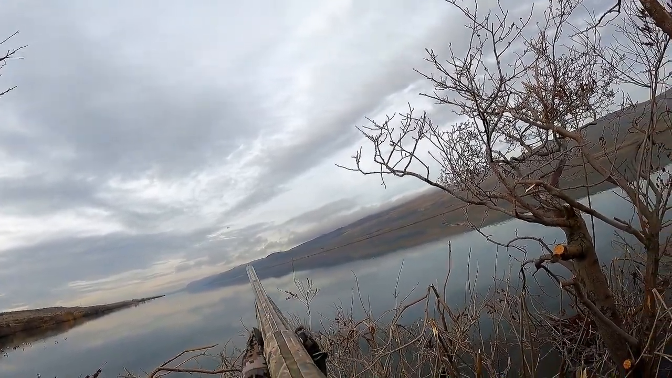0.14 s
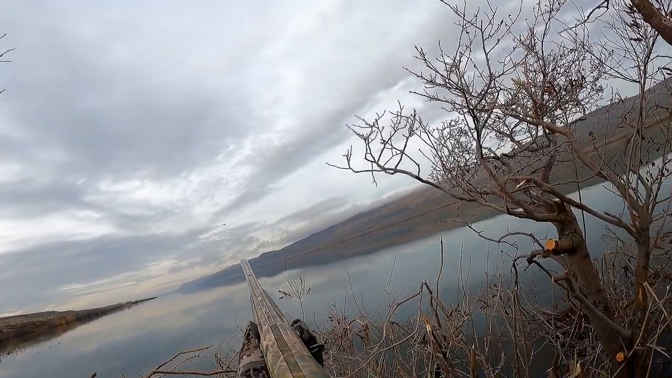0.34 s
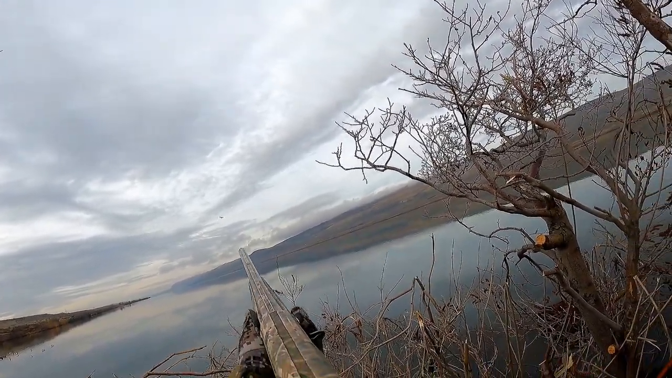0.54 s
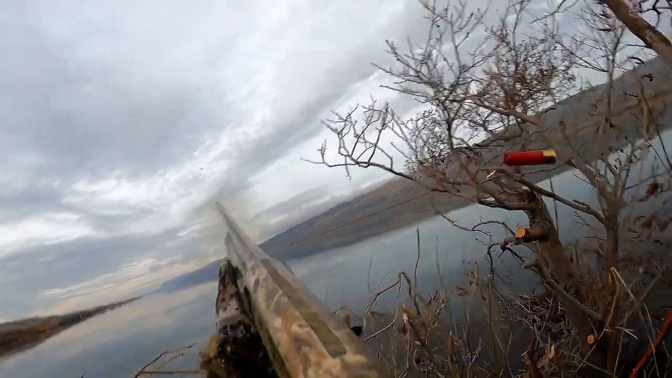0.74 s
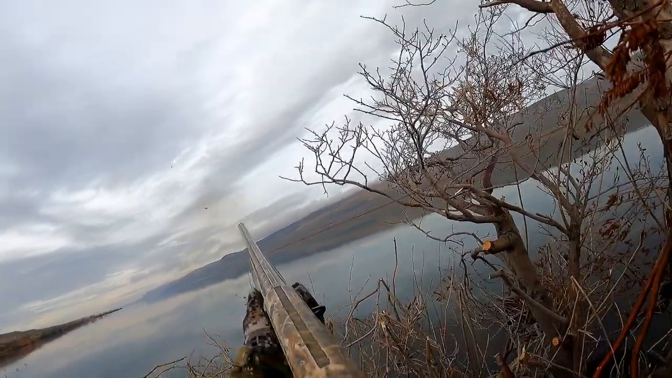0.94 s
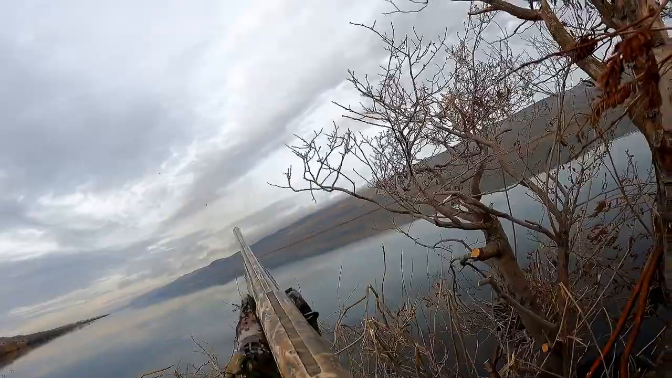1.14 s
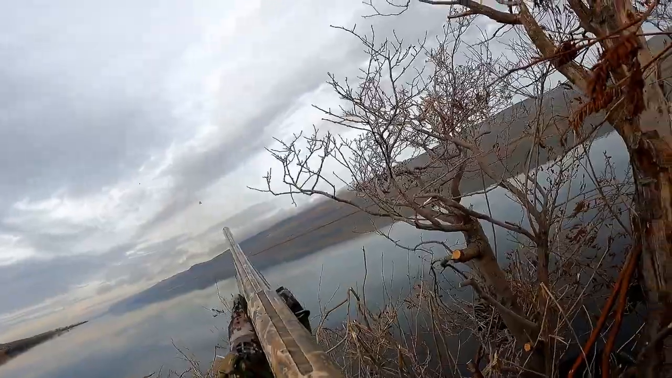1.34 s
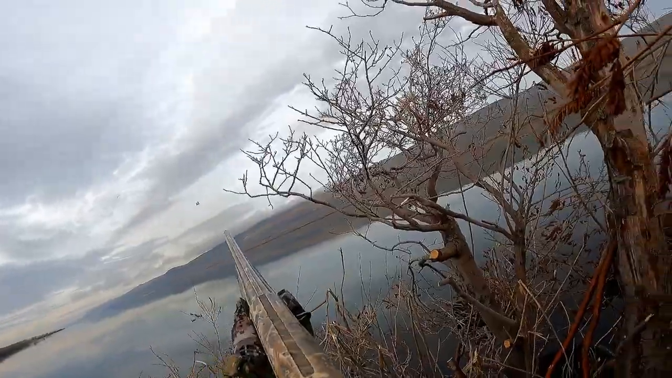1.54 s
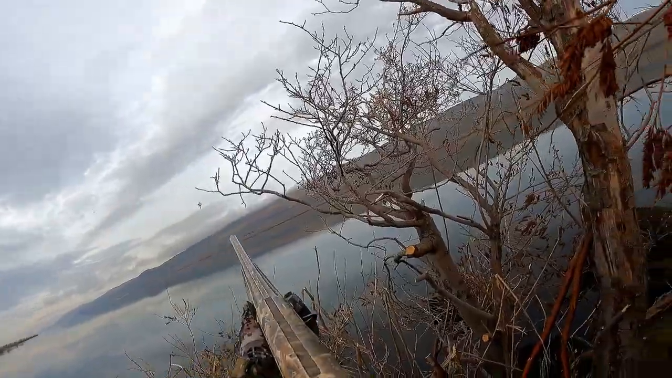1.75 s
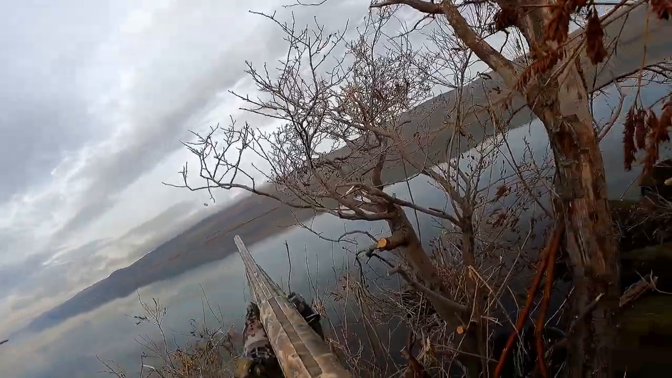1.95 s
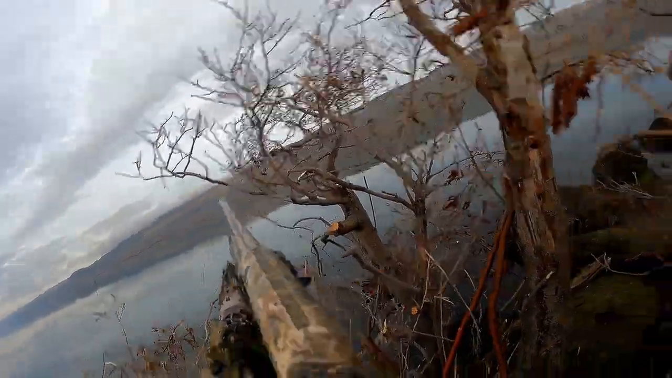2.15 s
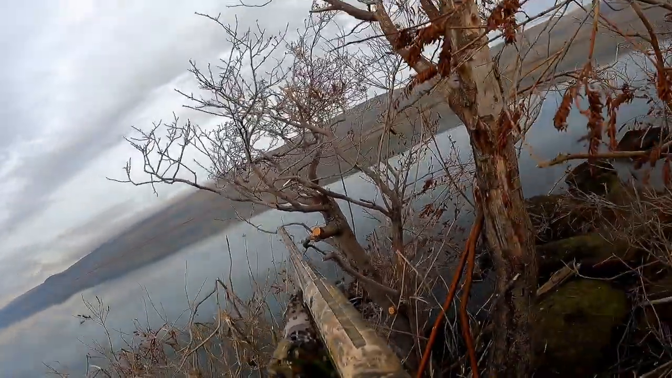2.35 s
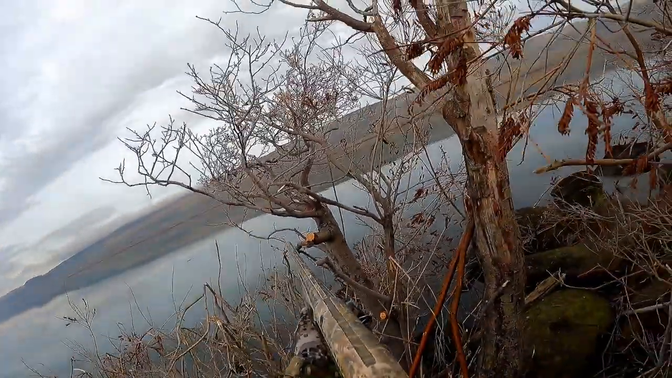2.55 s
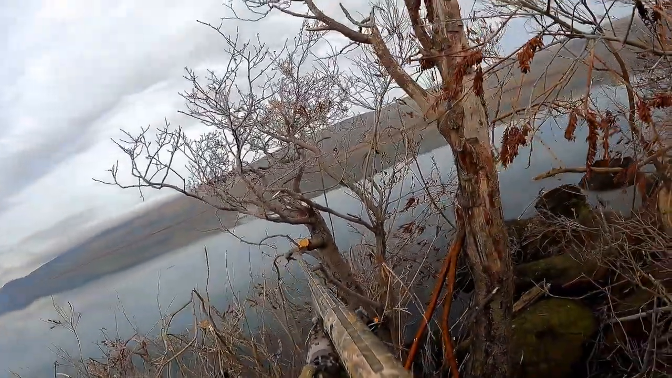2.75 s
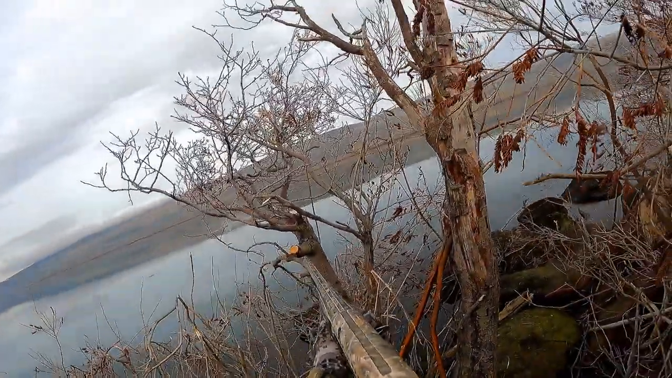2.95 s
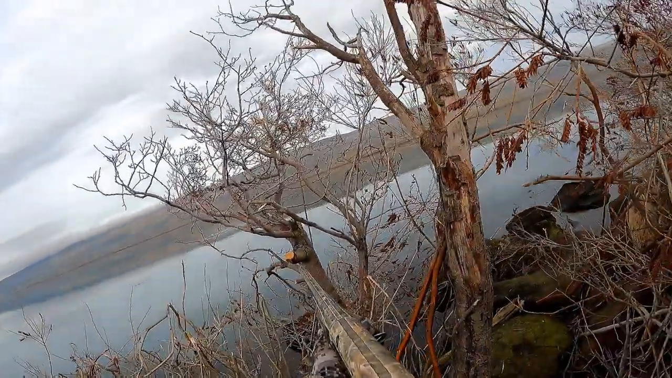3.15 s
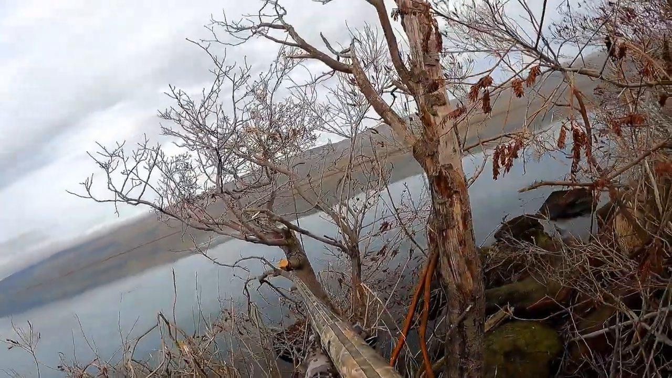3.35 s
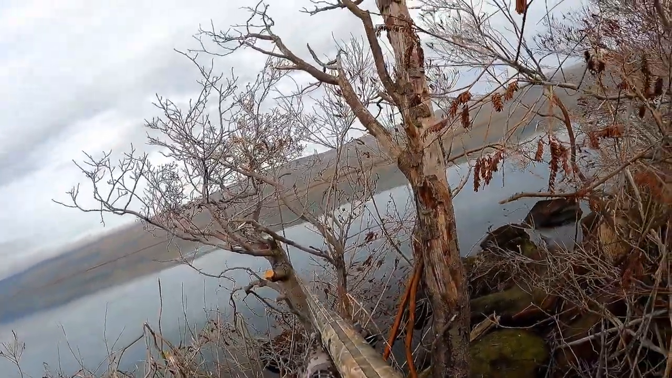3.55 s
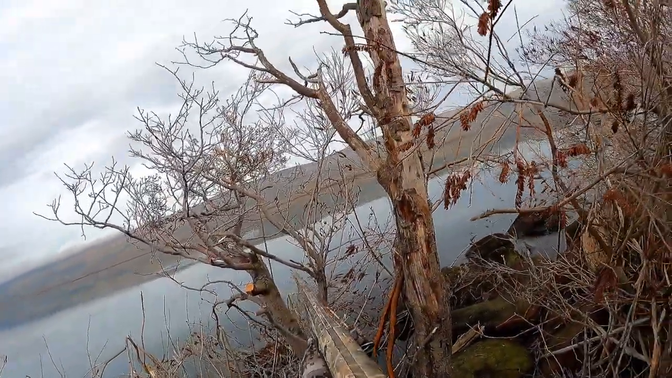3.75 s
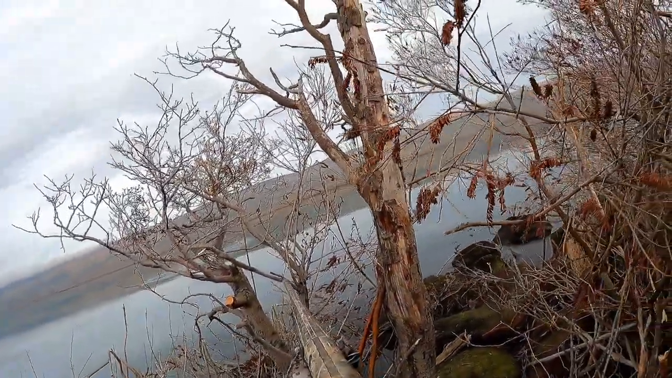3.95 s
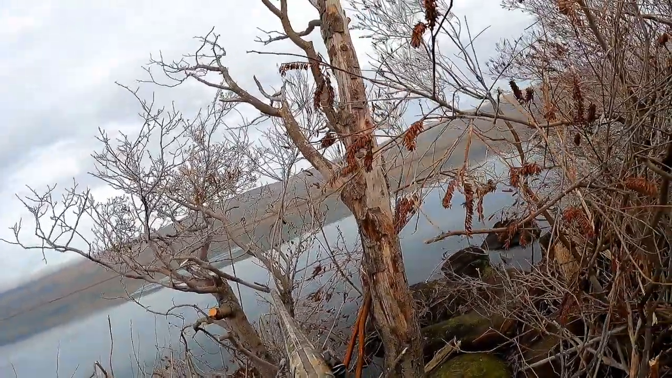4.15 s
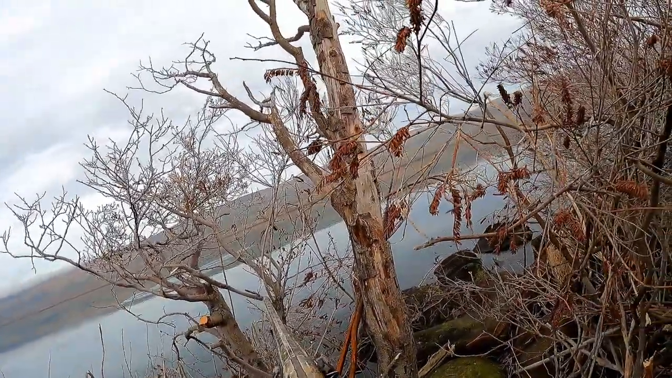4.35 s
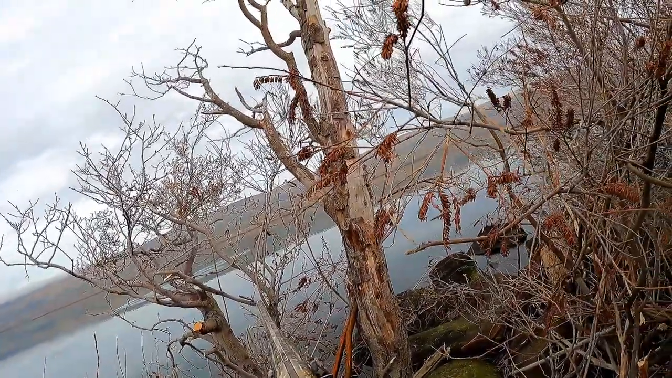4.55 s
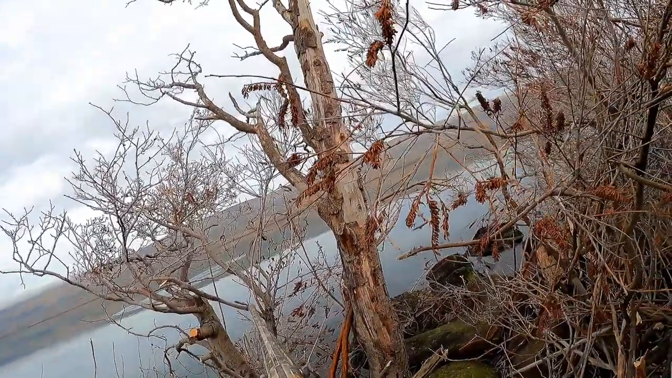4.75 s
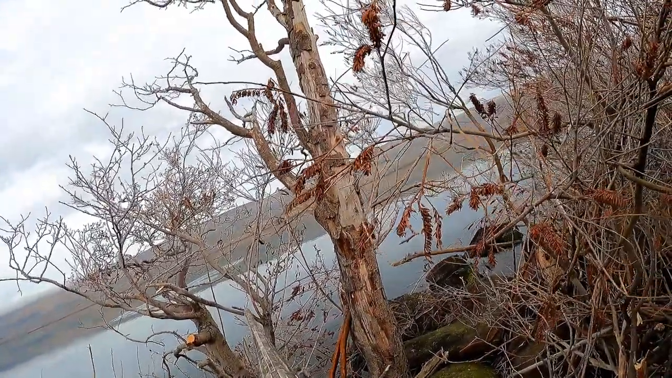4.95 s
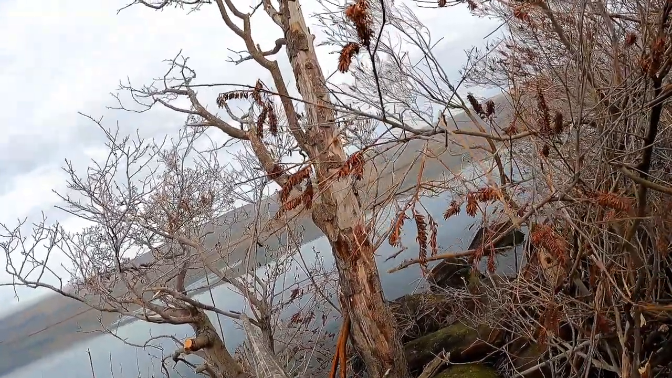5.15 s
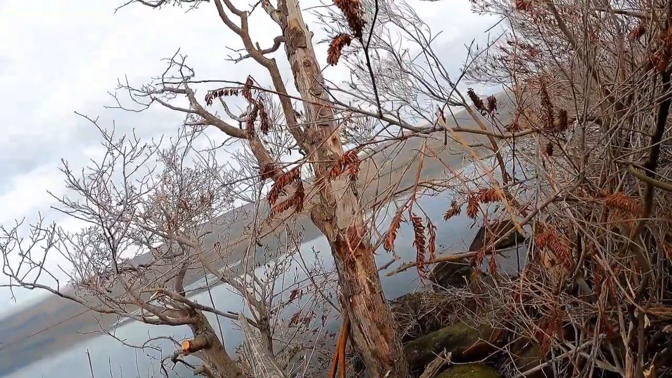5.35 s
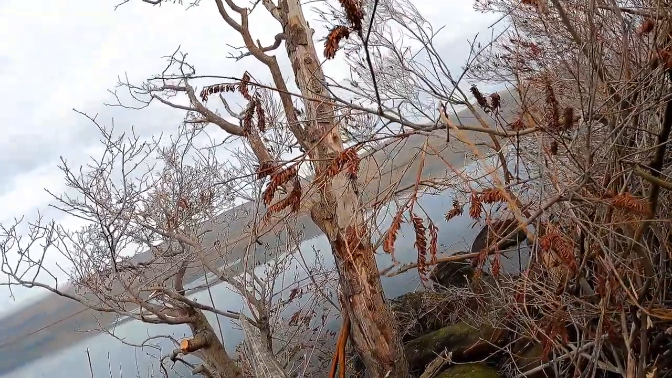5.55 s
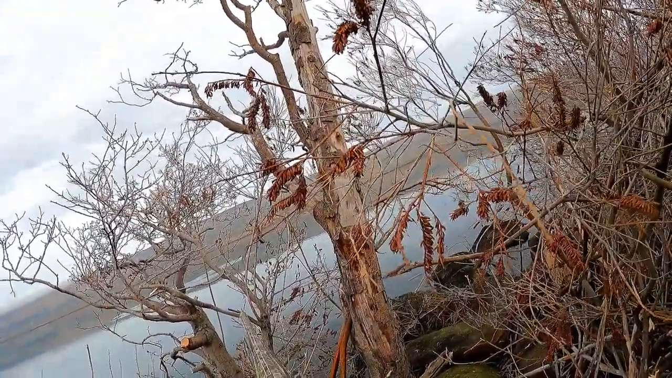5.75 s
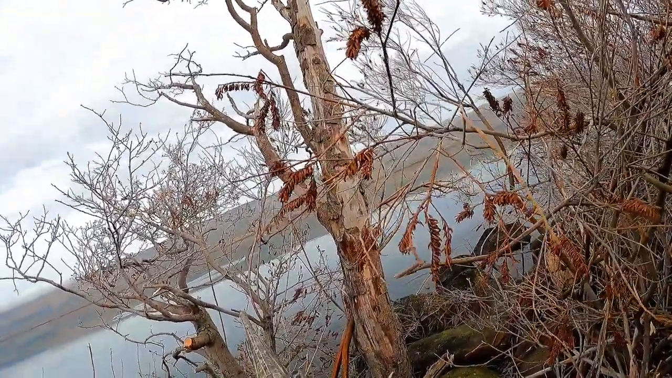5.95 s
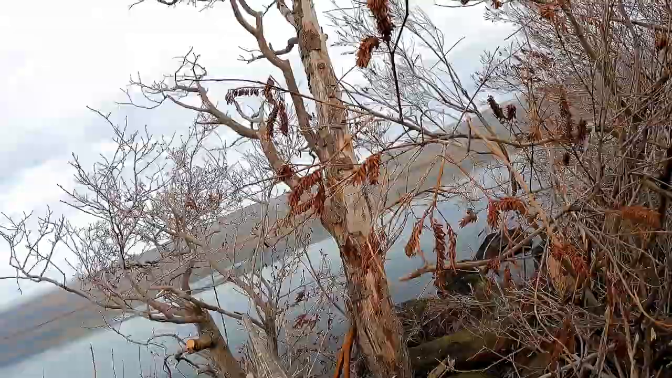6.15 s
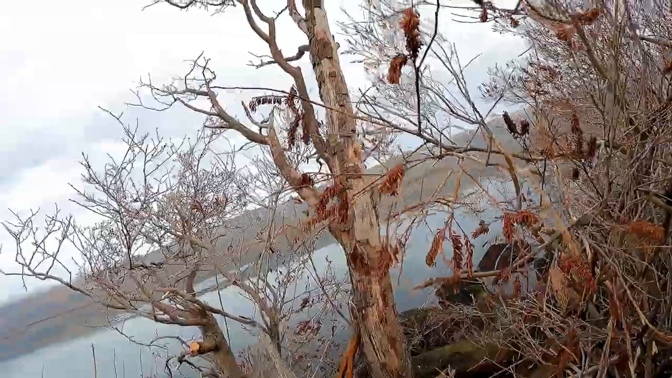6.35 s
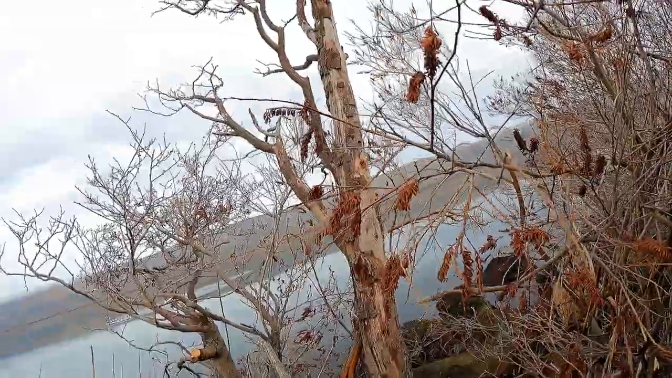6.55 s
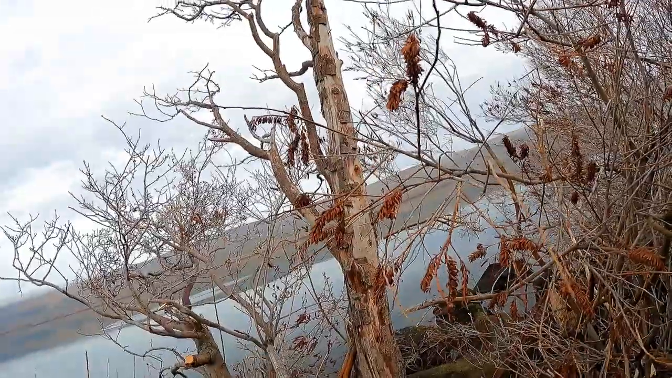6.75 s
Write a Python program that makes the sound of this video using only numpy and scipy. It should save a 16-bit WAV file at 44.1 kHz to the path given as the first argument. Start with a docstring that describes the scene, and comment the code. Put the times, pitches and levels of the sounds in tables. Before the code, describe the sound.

Body-worn microphone on a shooter at a wooded riverbank. After a quiet low engine drone, a shotgun blasts, its steel bolt clacks, an empty hull ticks and echoes return from the banks. A second blast follows with another slam and echoes. Then the jacket rustles and creaks, twigs snap, and the drone slowly grows. The loud shots overload the sound and duck the background, which gradually recovers.

```python
"""Two shots from a self-loading shotgun on a wooded river bank, heard from a camera worn by the shooter.
Each blast layers shaped noise bursts and pressure pulses; the bolt slams, hulls tick and ring, banks echo.
A jacket rustles and creaks, twigs snap and fittings clink, all from noise, clicks and gliding or decaying tones.
A distant engine of wavering tones drones over a dull roar; gain control ducks everything on overload."""
import sys
import numpy as np
from scipy import signal
from scipy.fft import rfft, irfft, next_fast_len
from scipy.io import wavfile
from scipy.ndimage import uniform_filter1d, minimum_filter1d

SR = 44100
rng = np.random.default_rng(int(sys.argv[2]) if len(sys.argv) > 2 else 0)


def wav_out(sig):
    """Save sig, one row per channel (or a flat mono array), as 16-bit PCM at SR to the path in sys.argv[1]."""
    wavfile.write(sys.argv[1], SR, np.round(np.clip(np.atleast_2d(sig).T, -1, 1) * 32767).astype(np.int16))


N = 303956
T = np.arange(N) / SR

# Shots. Each row: time in s, early noise level in dB, early noise rise in s per 60 dB,
# bark pitch in Hz, bark level in dB.
SHOTS = [(0.8765, -12, 0.0576, 1261, -1), (2.2577, -17.5, 0.0754, 1551, 4.5)]
# Muzzle wave and its returns from ground, rocks and trunks.
# Each row: time in s, level in dB, length in s, left minus right in dB.
RETURNS = [(0.8816, 17, 0.00037, -0.5), (0.891, 9.5, 0.00098, -2.5), (.9005, 4, 0.00066, -1.5),
           (0.9082, 8, 0.00095, -2), (2.2646, 12.5, 0.0016, -1.5), (2.2753, 10, 0.0005, -2),
           (2.2828, 9.5, 0.00094, -1.5), (2.2886, 7.5, 0.0012, -1.5)]
# Noise spectra. Each row: frequency in Hz, relative density in dB per Hz.
# Sharp crack, of shots and hull ticks.
CRACK_SPECTRUM = [(300, -12.5), (1000, -2.5), (1800, 1.5), (2600, -5.5), (5200, 2), (7500, -7),
                  (9000, -14.5), (16000, -22.5)]
# Low boom, of blast and recoil.
BOOM_SPECTRUM = [(25, -16.5), (70, -6), (140, 1.5), (260, -4), (380, -12.5), (600, -27), (2000, -64.5)]
# Scatter off brush, and the swish of a twig.
BRUSH_SPECTRUM = [(100, -2), (500, -0.5), (1500, -2), (4500, -2), (7500, -5.5), (12000, -10),
                  (16000, -32.5)]
# Shudder of the camera mount.
SHUDDER_SPECTRUM = [(25, -9.5), (80, -2), (130, -5), (200, -0.5), (280, 0.5), (370, -14), (600, -24),
                    (2000, -60)]
# Jacket cloth; also snaps and metal contact.
CLOTH_SPECTRUM = [(300, -12.5), (1500, -0.5), (4000, 1), (6500, -6), (8500, -16.5), (11500, -19),
                  (13500, -39.5), (16000, -53.5)]
# Low scraping, of jacket and hulls.
SCRAPE_SPECTRUM = [(300, -9.5), (1000, -1.5), (1900, 1.5), (2800, -12), (6000, -29.5)]


def undb(db):
    """Decibels to gain."""
    return 10 ** (np.asarray(db) / 20)


def response(spectrum, f):
    """Gains at f from (Hz, dB) points joined on a log-frequency axis."""
    hz, db = np.transpose(spectrum)
    return undb(np.interp(np.log(np.maximum(f, 1)), np.log(hz), db))


def noise(spectrum, side_db, lean=None):
    """Stereo noise of rms 1 with a given colour, width and lean to the left."""
    # Stereo width, narrow in the bass. Each row: frequency in Hz, side minus mid in dB before side_db.
    width = [(60, -13.5), (150, -12), (400, -4), (1200, 2), (2400, 4), (4500, -0.5), (8000, -0.5),
             (14000, 3)]
    size = next_fast_len(N)
    f = np.arange(size // 2 + 1) * SR / size
    mid, side = rfft(rng.standard_normal((2, size))) * response(spectrum, f)
    side = side * undb(side_db) * response(width, f)
    left = 1 if lean is None else np.sqrt(response(lean, f))
    out = irfft(np.array([(mid + side) * left, (mid - side) / left]), size)[:, :N]
    return out / out.std()


def colour(x, spectrum):
    """Filter a signal by a spectrum."""
    size = next_fast_len(N)
    f = np.arange(size // 2 + 1) * SR / size
    return irfft(rfft(x, size) * response(spectrum, f), size)[:N]


def burst(s, rise, t60):
    """Envelope that climbs 60 dB in rise seconds, peaks at s and decays 60 dB in t60 seconds."""
    return 1000. ** -np.minimum(np.maximum((s - T) / rise, (T - s) / t60), 10)


def stroke(s, length):
    """Envelope of one rub: rise, hold and fall, all slower for a longer movement."""
    rise_s = length  # per 60 dB, as is the fall
    fall_s = min(4.4 * length, 1)
    return 1000. ** -np.clip(np.maximum((s - T) / rise_s, (T - s - length) / fall_s), 0, 10)


def lowpass(x, hz):
    """Two-pole loss of treble."""
    return signal.sosfilt(signal.butter(2, min(hz, SR / 2 - 1000), fs=SR, output="sos"), x)


def resonance(x, hz, q):
    """One broad resonant peak at hz."""
    return signal.lfilter(*signal.iirpeak(hz, Q=q, fs=SR), x)


def walk(rate):
    """Smoothed random drift of rms about 1, redrawn rate times a second."""
    k = int(SR / rate)
    steps = np.repeat(rng.standard_normal(N // k + 1), k)
    out = uniform_filter1d(uniform_filter1d(steps, k), k)[:N]
    return out / out.std()


def ring(x, modes):
    """A body's decaying modes (Hz, dB, t60 s), driven by x; impulse response of unit energy."""
    t = T[:SR // 4]
    impulse = sum(undb(db) * np.sin(2 * np.pi * hz * t) * 1000. ** (-t / t60) for hz, db, t60 in modes)
    return signal.fftconvolve(x, impulse[None] / np.linalg.norm(impulse), axes=1)[:, :N]


def tone(pitch_hz):
    """Sine of a varying pitch."""
    return np.sin(2 * np.pi * np.cumsum(pitch_hz) / SR)


def pan(x, db):
    """Lean a sound to the left by db."""
    return x * undb(np.array([[db], [-db]]) / 2)


def crackle(rate, spread_db):
    """Creases of stiff fabric: random clicks, rate a second, a few much larger than the rest; rms 1."""
    size = undb(spread_db * np.minimum(rng.exponential(size=N), 4))
    clicks = (rng.random(N) < rate / SR) * size * rng.choice([-1, 1], N)
    return clicks / clicks.std()


def mottle(x, depth_db, size, count):
    """Shifting colour: patches about size x 86 Hz wide and count x 6 ms long rise and sink; rms 1."""
    z = signal.stft(x, nperseg=512)[2]
    field = rng.standard_normal(z.shape[-2:])
    for _ in range(2):
        field = uniform_filter1d(uniform_filter1d(field, size, axis=0), count, axis=1)
    out = signal.istft(z * undb(depth_db * field / field.std()))[1][..., :N]
    return out / out.std()


def blasts():
    """A short noise rises just before each report; then it cracks, barks, roars as gas expands and scatters."""
    # Expanding gas. Each row: frequency in Hz, relative density in dB per Hz.
    gas_spectrum = [(30, -13), (70, -2), (130, 6.5), (400, -5.5), (520, -7), (760, -1.5), (1000, -2),
                    (1400, -6), (1750, -3), (2400, -14), (3500, -7), (5200, -6.5), (8500, -22.5),
                    (11000, -23), (16000, -43.5)]
    # Noise that rises just before the report. Each row: frequency in Hz, relative density in dB per Hz.
    early_spectrum = [(40, -2), (150, 5.5), (700, 2), (2400, -5), (4000, -3.5), (7000, -14), (8000, -6),
                      (8600, -22), (14000, -39.5)]
    # Lows lean right, treble left. Each row: frequency in Hz, left minus right in dB.
    blast_lean = [(250, -2), (550, -1), (1300, -2), (4000, 0), (10000, 2.2)]
    # Resonances that colour the blast. Each row: frequency in Hz, relative level in dB, t60 in s.
    blast_modes = [(388, -3.5, 0.08), (758, -3.5, 0.056), (915, -1.5, 0.1), (1060, -1, 0.029),
                   (1260, 0, 0.041), (1537, -4, .06), (1834, -2, 0.07), (3320, -2.5, 0.13), (4690, -4, .05)]
    gas = noise(gas_spectrum, side_db=-9.5, lean=blast_lean)
    gas = gas + undb(-8) * ring(gas, blast_modes)
    crack = noise(CRACK_SPECTRUM, side_db=-12.5, lean=blast_lean)
    early = noise(early_spectrum, side_db=-7.5)
    boom = noise(BOOM_SPECTRUM, side_db=-1.5, lean=blast_lean)
    brush = noise(BRUSH_SPECTRUM, side_db=-8.0)
    mount = noise(SHUDDER_SPECTRUM, side_db=-4.5)
    scatter = sum(undb(db) * burst(s, rise=0.0055, t60=0.015) for s, db, _, _ in RETURNS)
    out = undb(-19) * brush * scatter
    for s, early_db, early_rise, bark_hz, bark_db in SHOTS:
        bark = resonance(brush, bark_hz, q=5)
        out = out + undb(early_db) * early * burst(s - .005, rise=early_rise, t60=0.094)
        out = out + undb(15) * crack * burst(s + 0.00065, rise=0.001, t60=0.015)
        out = out + undb(bark_db) * bark / bark.std() * burst(s + .004, rise=.006, t60=0.055)
        out = out + undb(8) * gas * burst(s + .004, rise=.005, t60=0.076)
        out = out + undb(-3.5) * boom * burst(s + 0.013, rise=0.055, t60=0.17)
        out = out + undb(-15) * mount * burst(s + 0.044, rise=0.05, t60=0.25)
        out = out + undb(-11) * brush * burst(s + 0.016, rise=0.027, t60=0.3)
    return out


def pressure_waves():
    """A suction between two positive lobes for each path."""
    out = 0
    for s, db, length, lean_db in RETURNS:
        u = (T - s) / length
        out = out + pan(undb(db) * (u ** 2 - 1) * np.exp(-.5 * u ** 2), db=lean_db)
    return out


def recoil():
    """A deep shake of the worn camera, low-passed noise that bridges the blast and the bolt's slam."""
    peak_delay_s, treble_limit_hz = 0.12, 110
    shake = lowpass(noise(BOOM_SPECTRUM, side_db=-8), treble_limit_hz)
    shape = sum(burst(s + peak_delay_s, rise=0.43, t60=0.42) for s, *_ in SHOTS)
    return undb(-20) * shake / shake.std() * shape


def action():
    """Steel parts clash and ring; the stock passes a low thump through the shooter's body."""
    # Bolt feeds, slams shut and locks; loading parts rattle.
    # Each row: time in s, relative level in dB, clash t60 in s, relative thump and shudder level in dB.
    clacks = [(0.994, -17, 0.064, -6), (1.0035, 4, .022, -11.5), (1.0079, 1.5, 0.025, -6.5),
              (1.029, -20, 0.02, -8.5), (1.079, -16.5, 0.017, -9.5), (1.173, -25.5, 0.012, -15.5),
              (1.1787, -18.5, 0.017, -8), (2.3185, -14, 0.014, -14.5), (2.3500, -19, 0.026, -7),
              (2.3605, 3.5, 0.02, -10.5), (2.3642, -3.5, 0.031, -5), (2.391, -18, 0.012, -9)]
    # Clash of steel. Each row: frequency in Hz, relative density in dB per Hz.
    clash_spectrum = [(120, -28.5), (200, -12), (579, -15), (1450, -5.5), (1710, -2), (2800, -13.5),
                      (3010, -15), (3300, -4), (5040, -5.5), (7130, -16.5), (10500, -16.5), (12400, -22.5),
                      (16000, -51)]
    # Stock's thump. Each row: frequency in Hz, relative density in dB per Hz.
    thump_spectrum = [(25, 2), (70, 0.5), (150, 2), (260, -5.5), (400, -15), (700, -34), (2000, -60)]
    # Receiver and barrel modes. Each row: frequency in Hz, relative level in dB, t60 in s.
    steel = [(930, -16, 0.017), (1210, -2.5, 0.019), (1750, -6, 0.018), (3070, 11, .025),
             (3600, -5.5, .025), (4140, 5.5, 0.023), (5000, -10, .02), (6500, -3, 0.023), (10900, -8, .02)]
    clash_shape = sum(undb(db) * burst(s + 0.0002366, rise=0.005, t60=t60) for s, db, t60, _ in clacks)
    thump_shape = sum(undb(db + low_db) * burst(s + 0.0018, rise=0.01, t60=0.052)
                      for s, db, _, low_db in clacks)
    shudder_shape = sum(undb(db + low_db) * burst(s + 0.03, rise=0.16, t60=0.2)
                        for s, db, _, low_db in clacks)
    clash = noise(clash_spectrum, side_db=-14.0) * clash_shape
    thump = noise(thump_spectrum, side_db=-0.5) * thump_shape
    shudder = noise(SHUDDER_SPECTRUM, side_db=-6) * shudder_shape
    metal = undb(-1) * clash + undb(-21.5) * ring(clash, steel)
    return pan(metal, db=-1) + pan(thump, db=-5.5) + undb(-19.5) * shudder


def hulls():
    """Empty hulls strike the bank: a plastic tick, and the open tube's air rings with a rough, rising pitch."""
    # Each row: time in s, tick level in dB, relative ring level in dB, ring rise in s, ring t60 in s, pitch in Hz.
    strikes = [(1.098, -33, -23, .09, .09, 1155), (1.7322, -35.5, -30, .008, .04, 1136),
               (1.746, -41, -24, 0.014, .042, 1112), (2.4260, -42, -21, .03, .055, 1082),
               (2.5960, -31, -27.5, 0.009, .035, 1030)]
    glide_per_s, rough_hz = 1.9, 35  # share of the pitch gained a second; rms scatter
    tick_shape = sum(undb(db) * burst(s, rise=0.0015, t60=0.031) for s, db, *_ in strikes)
    tick = noise(CRACK_SPECTRUM, side_db=-5.5) * tick_shape
    scuff = noise(SCRAPE_SPECTRUM, side_db=-14)
    rough = rough_hz * walk(300)
    out = 0
    for s, _, db, rise, t60, hz in strikes:
        tube = tone(hz * (1 + glide_per_s * np.clip(T - s, -t60, t60)) + rough)
        body = undb(-1.5) * tube + undb(-21) * scuff
        out = out + undb(db) * body * burst(s + 0.0027, rise=rise, t60=t60)
    return tick + out


def fittings():
    """Small metal parts tick and ring, each at its own pitch, as the gun swings."""
    # Each row: time in s, relative level in dB, pitch as a ratio.
    clinks = [(1.8948, -52.5, 0.86), (1.9274, -54, 0.94), (1.948, -56, 1.1), (1.991, -56, 1.4),
              (2.035, -58, 1.025), (2.065, -59, 1.03), (2.103, -56.5, .97)]
    # Ring at ratio 1. Each row: frequency in Hz, relative level in dB, t60 in s.
    fitting_modes = [(2120, -2, 0.039), (2750, -2, .04), (3330, 0, 0.051), (3593, 0, 0.0703),
                     (5050, -6, 0.023)]
    contact = noise(CLOTH_SPECTRUM, side_db=-5)
    out = 0
    for s, db, ratio in clinks:
        tap = undb(db) * contact * burst(s, rise=0.00296, t60=.04)
        modes = [(hz * ratio, gain_db, t60) for hz, gain_db, t60 in fitting_modes]
        out = out + undb(-1.0) * tap + undb(-9.0) * ring(tap, modes)
    return out


def echoes():
    """Trees return a grainy wash; the banks answer later, with less treble and each with its own limit."""
    # Each row: time in s, relative level in dB, linear rise in s, t60 in s, treble limit in Hz.
    banks = [(1.117, -37.5, 0.068, 0.69, 5970), (1.275, -34, 0.024, 0.24, 4200),
             (1.306, -27.5, 0.019, 0.17, 2450), (1.40, -50, 0.042, 0.82, 3220),
             (1.478, -24, 0.008, 0.39, 1106), (1.545, -39.5, 0.22, 0.49, 3514),
             (1.605, -35, 0.0028, 0.14, 2280), (1.64, -34, 0.0036, 0.18, 2040),
             (1.67, -30, 0.025, 0.29, 330), (2.679, -32.5, 0.0067, 0.29, 2010),
             (2.874, -31, 0.033, 0.37, 1380), (3.01, -43.5, 0.074, 0.33, 2365)]
    # Trees' wash. Each row: frequency in Hz, relative density in dB per Hz.
    woods_spectrum = [(40, 2.5), (250, 3.5), (600, -1), (1200, 0), (2500, -5.5), (4500, -6.5),
                      (8000, -17.5), (13000, -26), (16000, -45.5)]
    # Far banks' answer. Each row: frequency in Hz, relative density in dB per Hz.
    shore_spectrum = [(40, -5.5), (250, 8), (600, 1), (950, 0), (1250, 0.5), (1700, -5.5), (2150, -1.5),
                      (2550, -8), (3000, -4.5), (4500, -7.5), (8000, -17), (16000, -47)]
    woods = mottle(noise(woods_spectrum, side_db=-7.5), depth_db=1.86, size=7, count=2)
    woods = woods * undb(2.0 * walk(90))
    out = undb(-24.5) * woods * sum(burst(s + 0.091, rise=.06, t60=0.94) for s, *_ in SHOTS)
    far = mottle(noise(shore_spectrum, side_db=-7), depth_db=2.5, size=3, count=5)
    far = far * undb(1.2 * walk(90))
    for s, db, rise, t60, top_hz in banks:
        # a long shore builds its echo gradually
        shape = np.clip(1 + (T - s) / rise, 0, 1) * burst(s, rise=0.99, t60=t60)
        out = out + undb(db) * lowpass(far, top_hz) * shape
    return out


def jacket_rubs():
    """Cloth rubs in uneven grains of noise and clicks, with low scraping from clicks that ring folds."""
    # Rubs as the shooter turns and lowers the gun.
    # Each row: start in s, length in s, relative level in dB, scraping relative to cloth in dB.
    strokes = [(1.50, 0.15, -57, -6), (1.75, 0.047, -75, -1), (1.921, 0.032, -69.5, 11),
               (1.99, 0.76, -71.5, 3), (2.47, .07, -54, -8), (2.848, 0.026, -47, 3.5),
               (2.932, 0.13, -68, 4), (3.107, 0.022, -66, -5), (3.18, 0.42, -57, 1.5),
               (3.685, 0.33, -58, 1.5), (4.153, 0.034, -61, 7), (4.252, 0.29, -64, 6.5),
               (4.412, 0.057, -66.5, 3), (4.602, 0.089, -72.5, 6)]
    # Sleeve slides as the shooter leans.
    # Each row: peak in s, relative level in dB, relative scraping in dB, rise in s per 60 dB, t60 in s.
    slides = [(6.41, -59, -11, 0.36, 0.43), (6.61, -62, 13.5, 0.64, 0.88)]
    # Smooth fabric on itself. Each row: frequency in Hz, relative density in dB per Hz.
    sleeve_spectrum = [(500, -9), (2500, 1.5), (4000, -1.5), (6000, 0), (8500, -10), (12000, -13.5),
                       (14000, -32), (16000, -50)]
    fold_modes = [(1320, -1, .02), (1560, 3.0, .025), (1919, -0.5, 0.014), (2140, -2.5, 0.016)]  # Hz, dB, t60 s
    cloth = noise(CLOTH_SPECTRUM, side_db=-11.0) * undb(0.5 + 2.0 * walk(500))
    cloth = cloth + undb(1.5) * colour(crackle(rate=360, spread_db=3.5), CLOTH_SPECTRUM)
    cloth = undb(1.5) * mottle(cloth, depth_db=1.5, size=7, count=3)
    folds = ring(crackle(rate=170, spread_db=3.0)[None], fold_modes)
    scrape = undb(-3.5) * noise(SCRAPE_SPECTRUM, side_db=-9.0) + undb(-4.5) * folds
    scrape = undb(-1.5) * mottle(scrape, depth_db=3.5, size=4, count=3)
    sleeve = noise(sleeve_spectrum, side_db=-9.5) * undb(1.1 * walk(500))
    out = 0
    for s, length, db, scrape_db in strokes:
        out = out + undb(db) * stroke(s, length) * (cloth + undb(scrape_db) * scrape)
    for s, db, scrape_db, rise, t60 in slides:
        out = out + undb(db) * burst(s, rise, t60) * (sleeve + undb(scrape_db) * scrape)
    return out * undb(1.1 * walk(34))


def settling_creases():
    """Thin creases as the jacket settles: coloured random clicks."""
    # Each row: time in s, level in dB.
    settling = [(2.9, -87), (3.2, -64.5), (4.6, -69.5), (4.85, -74), (5.0, -85.5), (6.9, -93)]
    creases = colour(crackle(rate=700, spread_db=3.5), CLOTH_SPECTRUM)
    creases = mottle(creases, depth_db=3, size=9, count=2)
    return creases * undb(np.interp(T, *np.transpose(settling)))


def snap(s, source, hz, t60, ring_db):
    """A short crack of noise with a broad resonance at hz."""
    out, start = np.zeros((2, N)), int(s * SR)
    t = T[:SR // 10]
    attack = np.minimum(t / 0.00096, 1)
    crack = source[:, start:start + len(t)] * attack * 1000. ** (-t / t60)
    out[:, start:start + len(t)] = crack + undb(ring_db) * resonance(crack, hz, q=4)
    return out


def snaps_and_ticks():
    """Twigs snap, then the jacket cloth gives small ticks: short resonant noise cracks."""
    # Twigs snap; the last three rows are small ticks of the jacket cloth.
    # Each row: time in s, relative level in dB, pitch in Hz.
    snaps = [(1.2133, -35, 2000), (1.2387, -33, 2400), (2.539, -30.5, 5000), (2.8414, -26, 3300),
             (2.980, -32, 5000), (3.102, -52, 5780), (3.209, -39, 3610), (3.243, -46, 3180),
             (3.3327, -43, 4000), (3.449, -41, 6940), (3.4824, -40, 3530), (3.684, -42, 4500),
             (3.8635, -42, 3940), (3.883, -33.5, 2600), (3.9011, -30.5, 5000), (3.9503, -48, 4400),
             (4.1255, -47.5, 4970), (4.1638, -47, 3400), (4.3884, -47, 2600), (4.4182, -55, 3230),
             (4.615, -60.5, 5540), (4.698, -61.5, 3510), (4.79, -65, 4500), (4.855, -64, 4440),
             (6.334, -56, 4000), (6.397, -49, 5200), (6.673, -49, 3520)]
    grain = noise(CLOTH_SPECTRUM, side_db=-11.5)
    return sum(undb(db - 3.5) * snap(s, grain, hz, t60=0.019, ring_db=-1.0) for s, db, hz in snaps)


def twig_swish():
    """A twig whips across the sleeve: one short stroke of noise."""
    return undb(-47) * noise(BRUSH_SPECTRUM, side_db=-7) * stroke(2.3, length=0.017)


def creaks():
    """A stiff jacket fold sticks and slips: a short, rough, rising squeak."""
    # Each row: start in s, length in s, relative level in dB, pitch in Hz.
    squeaks = [(3.195, 0.011, -46.5, 1485), (3.56, .012, -59, 1650), (4.037, .014, -46, 1686),
               (4.108, .012, -47, 1585), (4.176, .012, -43.5, 1740), (4.232, 0.017, -55, 1673),
               (4.353, .016, -45.5, 1940), (4.464, 0.02, -47, 1480), (4.500, 0.013, -49, 2100)]
    glide_per_s, rough_hz = 1, 280.2  # share of the pitch gained a second; rms scatter
    rough = rough_hz * walk(900)
    out = 0
    for s, length, db, hz in squeaks:
        glide = 1 + glide_per_s * np.clip(T - s - length / 2, -length, length)
        out = out + undb(db) * stroke(s, length) * tone(hz * glide + rough)
    return pan(out * undb(-4 + 1.9 * walk(400)), db=-1.5)


def moan():
    """A faint, wavering low tone that sinks in pitch between the shots."""
    peak_s, centre_hz, sag_hz_per_s = 2.075, 264, 700
    pitch = centre_hz - sag_hz_per_s * np.clip(T - peak_s, -.05, .1) + 12 * walk(80)
    return undb(-38) * tone(pitch) * burst(peak_s, rise=.3, t60=.35)


def engine():
    """A far engine: wavering low tones, the lowest pair beating, growing steadily."""
    # Each row: frequency in Hz, relative level in dB.
    engine_tones = [(80.5, -43.5), (85.2, -45), (140, -52.5), (177.5, -51), (242.2, -57), (427, -58.5),
                    (485.5, -67)]
    throb_db, throb_db_per_s = -7.5, 1.37
    hum = 0
    for hz, db in engine_tones:
        level = np.sqrt(2) * undb(db + 1.2 * walk(14))
        hum = hum + level * tone(hz + 1.0 * walk(9.7))
    return pan(hum, db=-0.5) * undb(throb_db + throb_db_per_s * T)


def far_roar():
    """A dull roar and faint hiss: mottled noise of slowly varying level."""
    # Each row: frequency in Hz, relative density in dB per Hz.
    air_spectrum = [(20, -10), (45, -3.5), (85, -6), (115, -8.5), (210, -9.5), (380, -18), (620, -16.5),
                    (1000, -23.5), (1640, -35.5), (2000, -43.5), (3500, -68.5), (5500, -63), (9000, -72.5),
                    (15000, -88.5)]
    # Mostly to the left. Each row: frequency in Hz, left minus right in dB.
    air_lean = [(100, -1), (350, 1), (700, 5), (1300, 5.5), (2400, 4), (4400, -0.5), (14000, 1)]
    # Each row: time in s, relative level in dB.
    roar_levels = [(0, 3.5), (3.3, -1), (5.6, 0), (6.3, 2), (6.9, 2.6)]
    air = mottle(noise(air_spectrum, side_db=-7, lean=air_lean), depth_db=1.5, size=2, count=7)
    roar_db = np.interp(T, *np.transpose(roar_levels))
    return air * undb(-41 + roar_db + 0.53 * walk(6.6))


def scene():
    """Gun, shooter and river bank together."""
    gun = blasts() + pressure_waves() + recoil() + action() + hulls() + fittings()
    clothes = jacket_rubs() + settling_creases() + creaks()
    small = snaps_and_ticks() + twig_swish()
    return gun + echoes() + clothes + small + moan() + engine() + far_roar()


def gain_control(x, depth_db, release_db):
    """Turns down at once on overload, by at most depth_db, and recovers release_db a second."""
    peak = -minimum_filter1d(-np.abs(x).max(axis=0), size=SR // 1000)
    over = np.clip(20 * np.log10(peak + 1e-9), 0, depth_db)
    return x * undb(release_db * T - np.maximum.accumulate(over + release_db * T))


def record(dry):
    """Gain control, clipping of the tallest peaks and a steep top cut."""
    top_hz = 15900
    held = np.clip(gain_control(dry, depth_db=18, release_db=8), -.97, .97)
    return signal.sosfilt(signal.ellip(8, .2, 70, top_hz, fs=SR, output="sos"), held)


dry = scene()
out = record(dry)
wav_out(out)
```